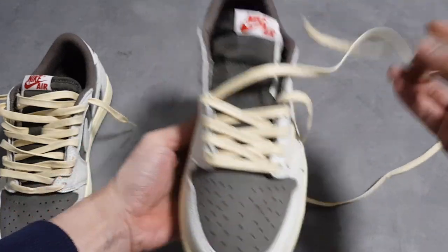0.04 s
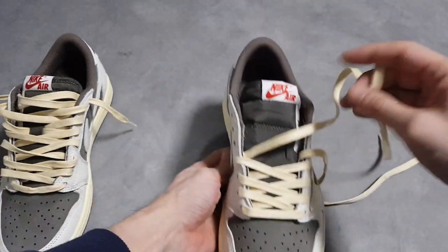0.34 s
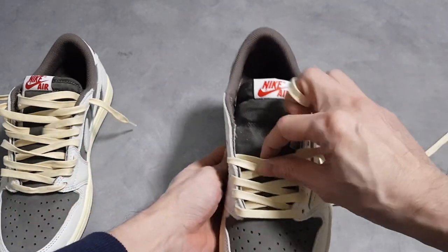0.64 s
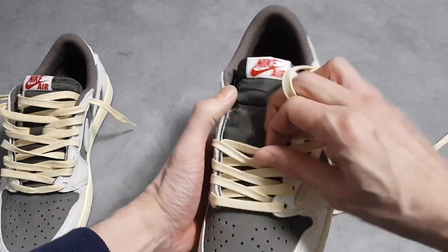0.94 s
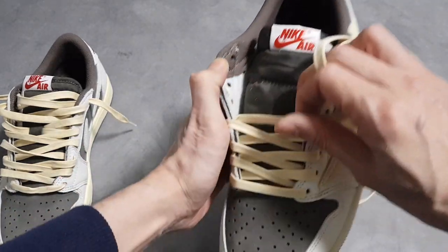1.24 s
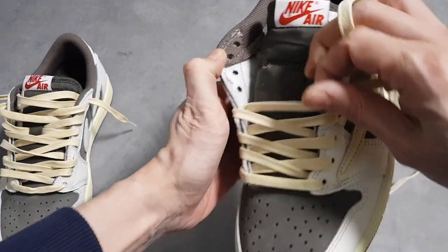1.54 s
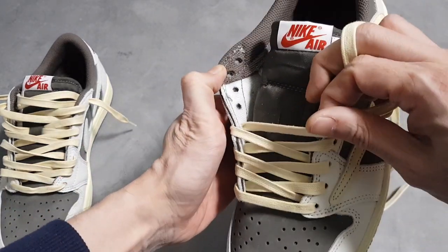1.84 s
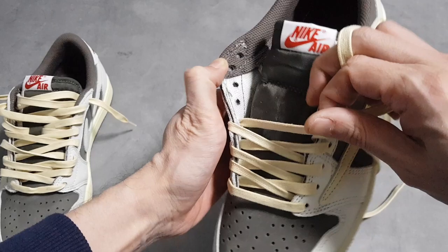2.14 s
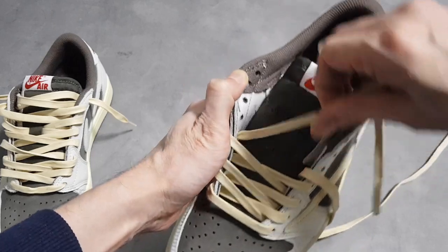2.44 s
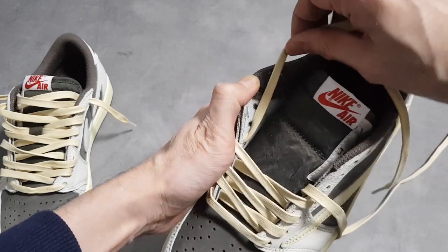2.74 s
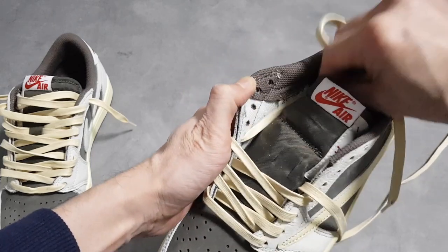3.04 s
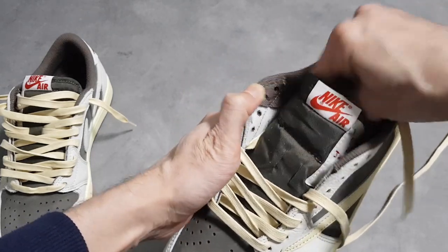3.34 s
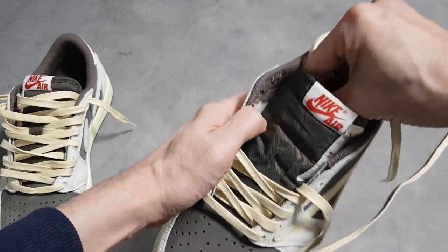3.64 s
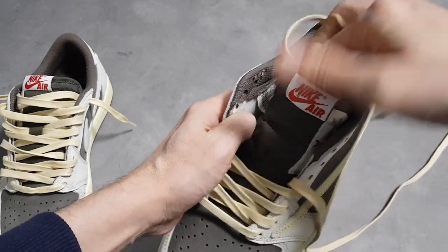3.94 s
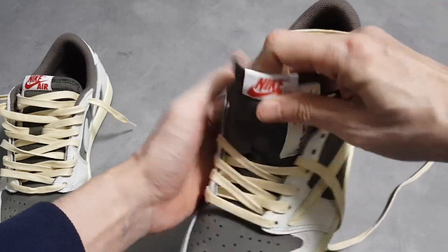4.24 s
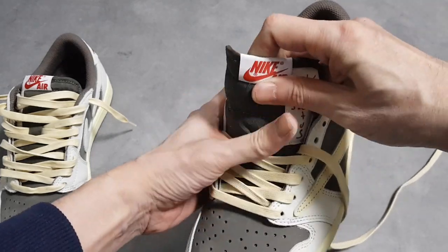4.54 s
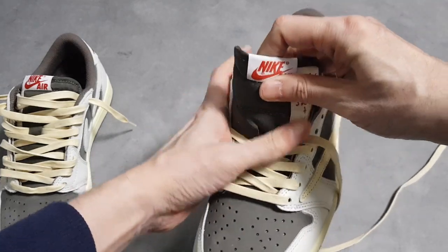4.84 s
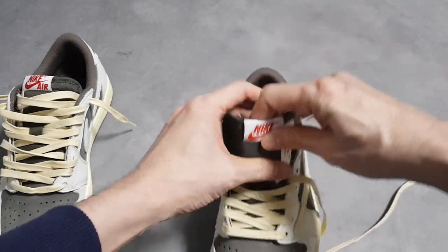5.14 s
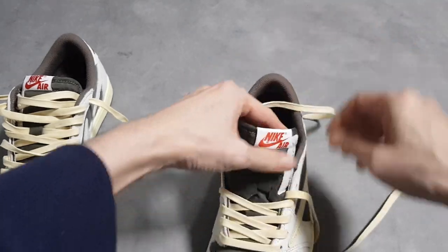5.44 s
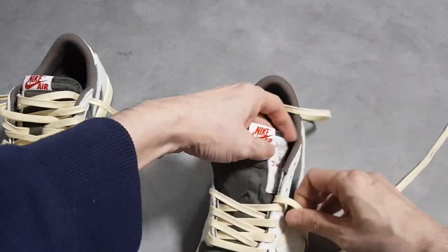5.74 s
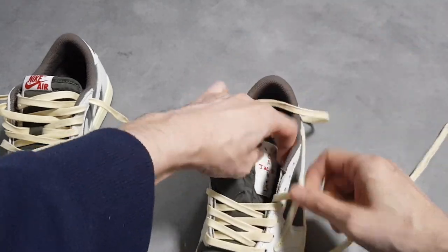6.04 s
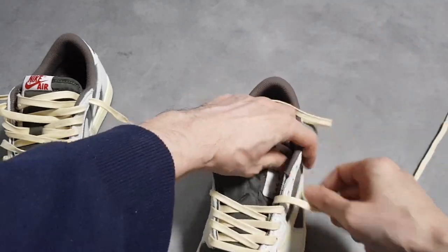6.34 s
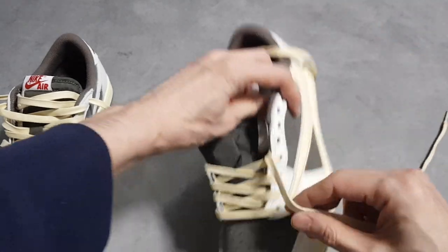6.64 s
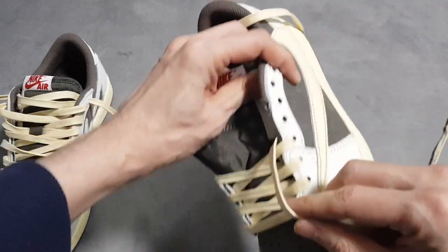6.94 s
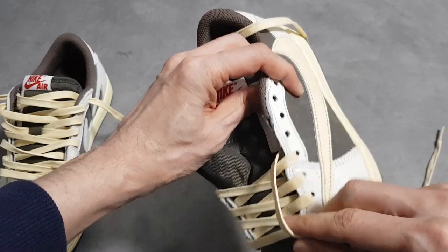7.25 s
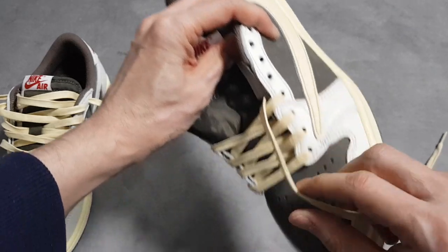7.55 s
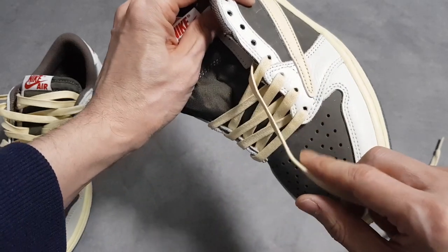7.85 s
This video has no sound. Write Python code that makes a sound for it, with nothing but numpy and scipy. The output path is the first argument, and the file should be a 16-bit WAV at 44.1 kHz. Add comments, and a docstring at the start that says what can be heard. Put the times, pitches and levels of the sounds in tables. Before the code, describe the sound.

In a quiet, small room, close to a stereo microphone, a sneaker is shifted and a hard lace tip clacks on the table and skids. Fingers rustle and scrape at the lace. The leather tongue is dragged out with louder rubbing, small snaps and hollow knocks. The rubber sole thumps down softly and rocks, and the lace slides through an eyelet with a faint zip before the handling dies away.

```python
"""Hands lace a leather sneaker on a table in a quiet, small room, close to a stereo microphone.
The shoe is shifted, and the hard lace tip strikes the table and skids. Fingers loosen the lace, then
drag the tongue out (3 s): stick-slip friction rubs and snaps, and the hollow upper knocks in its modes.
The tongue is tucked back as the rubber sole is set down and rocks (5.2 s). Last, the woven lace is
drawn through an eyelet and sings faintly as its threads pass (6.4 s)."""
import sys
import numpy as np
from scipy import signal
from scipy.fft import rfft, irfft, next_fast_len
from scipy.io import wavfile
from scipy.ndimage import uniform_filter1d

SR = 44100
rng = np.random.default_rng(int(sys.argv[2]) if len(sys.argv) > 2 else 0)


def put_to_file(sound):
    """Save the sound as 16-bit audio at rate SR, in the file named by the first command-line argument."""
    columns = np.atleast_2d(sound).T  # one column per channel
    safe = np.clip(columns, -1, 1)
    whole_steps = np.round(safe * 32767)
    wavfile.write(sys.argv[1], SR, whole_steps.astype(np.int16))


N = 348831
TIME = np.arange(N) / SR


def amplitude(db):
    """The decibel law: 20 dB is a factor of ten in amplitude."""
    return 10 ** (np.asarray(db) / 20)


def unit_rms(x):
    """Normalisation to a mean power of 1."""
    return x / np.sqrt(np.mean(x ** 2) + 1e-20)


def curve_at(points, hz):
    """Interpolation of a table on a logarithmic frequency axis."""
    f, value = np.transpose(points)
    return np.interp(np.log(hz + 1), np.log(f + 1), value)


def add_at(mix, start_s, sound):
    """Superposition: a sound adds to the mix from start_s on."""
    part = mix[..., max(round(start_s * SR), 0):][..., :sound.shape[-1]]
    part += sound[..., :part.shape[-1]]


def filtered(x, spectrum):
    """Zero-phase filtering by a spectrum that falls 12 dB an octave beyond its ends."""
    size = next_fast_len(x.shape[-1] + 2000)
    hz = np.fft.rfftfreq(size, 1 / SR) + 1
    skirts = np.minimum(hz / spectrum[0][0], 1) ** 2 * np.minimum(spectrum[-1][0] / hz, 1) ** 2
    response = amplitude(curve_at(spectrum, hz)) * skirts
    return irfft(rfft(x, size) * response, size)[..., :x.shape[-1]]


def wander(bandwidth_hz):
    """Low-pass Gaussian noise: a smooth random fluctuation of rms 1."""
    size = next_fast_len(N)
    hz = np.fft.rfftfreq(size, 1 / SR)
    low_pass = np.exp(-(hz / bandwidth_hz) ** 2)
    return unit_rms(irfft(rfft(rng.standard_normal(size)) * low_pass, size)[:N])


def swells(movements, drop_db=16, rise_shape=1.31, fall_shape=1.114):
    """Incoherent addition: the powers sum, each drop_db down one rise before and one fall after its peak."""
    t, power = TIME[::32], 0
    for peak_s, rise_s, fall_s, db in movements:
        before = (np.maximum(peak_s - t, 0) / rise_s) ** rise_shape
        after = (np.maximum(t - peak_s, 0) / fall_s) ** fall_shape
        power = power + amplitude(db - drop_db * (before + after)) ** 2
    return np.interp(TIME, t, np.sqrt(power))


def modal_impact(modes, contact_ms, pitch=1, ring=1):
    """Modal superposition: damped sines of alternating sign; a longer contact favours the low modes."""
    t = np.arange(SR // 2) / SR
    contact_s = contact_ms / 1000
    ringing = np.zeros(len(t))
    for k, (hz, db, t60) in enumerate(modes):
        strength = (-1) ** k * amplitude(db) / (1 + (hz * pitch * contact_s) ** 2)
        decay = np.exp(-np.log(1000) * t / (t60 * ring))
        ringing += strength * np.sin(2 * np.pi * hz * pitch * t) * decay
    ringing *= 1 - np.exp(-t / contact_s)
    return ringing / abs(ringing).max()


def click(spectrum, size=2048):
    """Minimum-phase impulse response: the most compact causal pulse with this spectrum, at peak 1."""
    hz = abs(np.fft.fftfreq(size, 1 / SR))
    log_gain = np.log(amplitude(curve_at(spectrum, hz)))
    response = np.exp(np.conj(signal.hilbert(log_gain)))
    pulse = np.fft.ifft(response).real[:size // 2]
    return pulse / abs(pulse).max()


# Likeness of the sound at the two capsules: f/Hz, coherence
CAPSULE_COHERENCE = [(60, 0.66), (300, 0.86), (700, 0.53), (1400, 0.46), (3100, 0.25), (6800, 0),
                     (15000, 0.092)]
def spaced(pair):
    """Spatial coherence: two spaced capsules hear long waves more alike than short ones."""
    size = next_fast_len(pair.shape[-1])
    coherence = np.clip(curve_at(CAPSULE_COHERENCE, np.fft.rfftfreq(size, 1 / SR)), -1, 1)
    mid, side = rfft(pair, size) * np.sqrt([(1 + coherence) / 2, (1 - coherence) / 2])
    return irfft(np.array([mid + side, mid - side]), size)[:, :pair.shape[-1]]


def stereo_noise(samples=N):
    """White noise, partly coherent between the capsules."""
    return spaced(rng.standard_normal((2, samples)))


# Reverberation time of the small room: f/Hz, T60/s
ROOM_DECAY = [(80, 0.5), (300, 0.4), (1000, 0.17), (4000, 0.13), (14000, 0.29)]
def room(x, near_db, tail_db, near_t60=0.046):
    """Convolution: the direct sound is joined by quick scatter from table and hands and by reverberation."""
    t = np.arange(SR // 2) / SR
    hz, frame_s, bands = signal.stft(stereo_noise(len(t)), SR, nperseg=256)
    decay = amplitude(-60 * frame_s / curve_at(ROOM_DECAY, hz)[:, None])
    tail = signal.istft(bands * decay, SR, nperseg=256)[1][:, :len(t)]
    tail *= np.clip((t - .004) / 0.00684, 0, 1)  # builds up after 4 ms
    near = stereo_noise(len(t)) * np.exp(-np.log(1000) * t / near_t60) * (t > .0005)
    echo = amplitude(near_db) * near / np.linalg.norm(near[0])
    echo += amplitude(tail_db) * tail / np.linalg.norm(tail[0])
    reflected = signal.oaconvolve(np.atleast_2d(x), echo, axes=1)[:, :N]
    return (x + reflected) / np.sqrt(1 + np.sum(echo[0] ** 2))


# Spectrum of still air and microphone hiss: f/Hz, level/dB
AIR_SPECTRUM = [(20, -38.5), (55, -8), (85, 1.5), (120, -3), (150, 3), (190, -12), (270, 5), (400, -7),
                (560, -24.5), (1100, -20.5), (1900, -22.5), (4000, -27), (8500, -34.5), (12000, -23),
                (16000, -22)]
def still_air(level_db=-64):
    """Stationary noise: the room and the microphone set a steady floor."""
    return amplitude(level_db) * unit_rms(filtered(stereo_noise(), AIR_SPECTRUM))


# Response of the swaying table: f/Hz, level/dB
TABLE_SPECTRUM = [(20, -38), (38, -8.5), (50, 5), (62, 3.5), (82, 3), (115, -12), (150, -7), (200, -30.5),
                  (320, -30)]
# The hands lean on the table: peak t/s, rise/s, fall/s, level/dB
HAND_LOADS = [(.08, 0.12, 0.18, -47.5), (.4, 0.27, 0.13, -51.5), (5.35, 0.39, 0.62, -53),
              (6.32, 0.043, 0.09, -51), (6.6, .3, .3, -57)]
def table_sway(resting_db=-67.5, coupling_db=-22):
    """Forced vibration: the table rumbles under leaning hands, strokes on the shoe and resting arms."""
    hollow_level = stroke_levels()[0]
    from_shoe = amplitude(coupling_db) * hollow_level
    push = np.sqrt(swells(HAND_LOADS) ** 2 + from_shoe ** 2 + amplitude(resting_db) ** 2)
    return unit_rms(filtered(stereo_noise(), TABLE_SPECTRUM)) * push


# The lace runs through an eyelet, one list a pull: t/s, thread-passing f/Hz, relative level/dB
EYELET_PULLS = [
    [(1.26, 5100, -72), (1.33, 5900, -74), (1.45, 4500, -78), (1.55, 5900, -89)],
    [(6.36, 6150, -68), (6.47, 5850, -66), (6.56, 5550, -65), (6.62, 5700, -74), (6.69, 5350, -71),
     (6.78, 4700, -86)],
]
# Partials of the weave's tone: harmonic number, relative level/dB
WEAVE_HARMONICS = [(1, -5), (2, -5)]
def lace_pulls(gain_db=-4, jitter=.02):
    """Periodic excitation: the pitch is the uneven rate of passing threads and sinks as the hand slows."""
    out = np.zeros(N)
    unevenness = 1 + jitter * wander(400)
    flutter = wander(90)
    for pull in EYELET_PULLS:
        times, thread_hz, db = np.transpose(pull)
        on = (TIME > times[0]) & (TIME < times[-1])
        cycles = np.cumsum(np.interp(TIME[on], times, thread_hz) * unevenness[on]) / SR
        tone = sum(amplitude(level) * np.sin(2 * np.pi * k * cycles) for k, level in WEAVE_HARMONICS)
        envelope = amplitude(np.interp(TIME[on], times, db) + gain_db) * signal.windows.tukey(on.sum(), .2)
        out[on] += unit_rms(tone * flutter[on]) * envelope
    return room(out, near_db=-3, tail_db=-7)


# Modes of the sole on the table: f/Hz, level/dB, T60/s
SOLE_MODES = [(53.5, -20, 0.39), (83.6, -15, 0.14), (156.2, -12, 0.13), (207.7, -6, 0.057),
              (278.3, -1, 0.044), (349.4, -4.5, 0.1), (459.4, -7, 0.053), (609.6, -1, 0.055),
              (937, -13.5, 0.054), (1259, -15.5, 0.025)]
# The sole lands and rocks: t/s, relative level/dB, contact time/ms
SOLE_IMPACTS = [(0.061, -45.5, 30), (0.182, -51, 11), (5.1597, -21, 0.14), (5.164, -19.5, 1.2),
                (5.178, -29, 2), (5.188, -31.5, 7.9), (5.208, -30.5, .7), (5.23, -34, 8.7),
                (5.2637, -34, 0.68), (5.268, -21, 1.2), (5.2762, -35, 4.7), (5.303, -32, 1.9),
                (5.352, -58, 1.7), (5.636, -36, 1.2), (6.336, -41, 4.9)]
def sole_thumps(gain_db=1):
    """Impact excitation: heel and toe meet the table and ring the modes of the rubber sole."""
    out = np.zeros(N)
    for start_s, db, contact_ms in SOLE_IMPACTS:
        add_at(out, start_s, amplitude(db + gain_db) * modal_impact(SOLE_MODES, contact_ms))
    return room(out, near_db=-9, tail_db=-10)


# Modes of the hollow upper, before the grip scales them: f/Hz, level/dB, T60/s
UPPER_MODES = [(289, -13.5, 0.059), (400, 5.5, 0.044), (476.4, 2.5, 0.035), (680, -12, 0.034),
               (850, 4, 0.017), (1090, -7.5, 0.014), (1540, -6.5, 0.019), (2122, -24.5, 0.011)]
# Fingers and lace knock on it: t/s, relative level/dB, contact time/ms, frequency factor, T60 factor
UPPER_IMPACTS = [(0.0483, -29.5, 0.6, 1.16, 1.2), (0.784, -41.5, 0.27, 1.03, 0.9),
                 (0.99, -39.5, 1.6, 1.1, 0.6), (1.131, -40.5, 0.79, 1.14, 1),
                 (1.263, -44, 0.18, 0.97, 0.54), (1.581, -42.5, 0.93, 1.1, 1.3),
                 (2.4215, -40, 1.5, 1.03, 0.68), (2.950, -44.5, 1.1, 0.94, 1.2),
                 (3.05, -30, 0.35, 1.04, 0.54), (3.1329, -33.5, 0.89, 1, 1), (3.173, -38.5, 0.29, 1.07, .8),
                 (3.378, -30.5, 0.71, 1.04, 0.88), (3.402, -25.5, 0.5, 1.16, 0.15),
                 (3.603, -23, 0.13, 1.165, 0.41), (4.000, -30, 0.29, 1.7, 0.14),
                 (4.010, -32.5, 0.66, 1.5, 0.52), (4.404, -38, 0.41, 1.32, 2.3),
                 (4.968, -47, 0.9, 2.43, 1.8), (6.075, -40.5, 2.5, 1.29, 2.2),
                 (6.9015, -44.5, 3.3, 1.07, 3.5), (7.3423, -45.5, 4.3, 1.01, 2.6)]
def upper_knocks(gain_db=2):
    """Damped free vibration: the hollow upper rings after each knock, tuned and damped by the grip."""
    out = np.zeros(N)
    for start_s, db, contact_ms, pitch, ring in UPPER_IMPACTS:
        add_at(out, start_s, amplitude(db + gain_db) * modal_impact(UPPER_MODES, contact_ms, pitch, ring))
    return room(out, near_db=-9, tail_db=-8)


# Threads and leather snap free: t/s, level/dB, decay time/ms
RELEASES = [(.784, -36, 5), (.9393, -54, 3), (1.0805, -50, 3), (1.2634, -46, 3), (3.048, -41, 5),
            (3.1333, -33, 3.5), (3.171, -39, 6), (3.4034, -30, 4), (3.5995, -29, 7), (3.6764, -39, 2),
            (3.854, -34, 3), (4.046, -41, 3), (4.108, -39, 3), (4.138, -39, 3), (4.206, -44, 3),
            (4.217, -42, 2), (4.272, -41, 2.5), (4.6235, -60, 3), (5.043, -40, 5), (5.1595, -37, 5),
            (5.8601, -57, 2)]
# Spectrum of a snap: f/Hz, level/dB
SNAP_SPECTRUM = [(500, -0.5), (1200, -7.5), (2100, -3), (4300, -4), (6500, -5.5), (8500, -12), (15000, -8)]
def snaps():
    """Relaxation: each catch lets go in a noise burst of tiny slips that decays exponentially."""
    t = np.arange(SR // 10) / SR
    envelope = np.zeros(N)
    for start_s, db, decay_ms in RELEASES:
        add_at(envelope, start_s, amplitude(db) * np.exp(-1000 * t / decay_ms))
    bursts = unit_rms(filtered(stereo_noise(), SNAP_SPECTRUM)) * envelope
    return room(bursts, near_db=-14, tail_db=-10, near_t60=.04)


# Skin, lace and rubber drag: start t/s, peak t/s, end t/s, f/Hz, bandwidth of one stage/Hz, level/dB
DRAG_RESONANCES = [(0.575, 0.599, 0.63, 1030, 250, -41), (0.646, 0.722, 0.85, 468, 167, -47),
                   (0.618, 0.672, 0.81, 2320, 910, -44.5), (1.22, 1.32, 1.74, 1900, 200, -72),
                   (3.169, 3.175, 3.185, 950, 298, -38.5), (3.357, 3.375, 3.6, 740, 259, -53),
                   (3.586, 3.604, 3.36, 927, 205, -33), (4.63, 5.014, 5.44, 990, 222, -66.5),
                   (5.186, 5.25, 5.8, 603, 79.5, -55), (5.587, 5.69, 5.82, 570, 130, -55),
                   (5.86, 6.06, 5.7, 530, 110, -54), (6.294, 6.338, 6.365, 1520, 800, -45.5),
                   (6.295, 6.424, 7.03, 1860, 417, -63), (6.363, 6.51, 7.1, 305, 149, -55.5)]
def drags():
    """Resonance: friction noise swells and fades in one narrow band, formed by two filter stages."""
    out, friction = np.zeros((2, N)), stereo_noise()
    for start_s, peak_s, end_s, hz, width_hz, db in DRAG_RESONANCES:
        on = (TIME > start_s) & (TIME < end_s)  # a row that ends before it starts is silent
        b, a = signal.iirpeak(hz, hz / width_hz, SR)
        band = signal.lfilter(b, a, signal.lfilter(b, a, friction[:, on]))
        envelope = np.interp(TIME[on], [start_s, peak_s, end_s], [0, 1, 0])
        out[:, on] += unit_rms(band) * amplitude(db) * envelope
    return out


# The lace tip strikes the table and chatters: t/s, level/dB, left minus right/dB
TIP_IMPACTS = [(.2134, -8, -5), (.2150, -19, 2), (.2156, -18, 4), (.2177, -20, 4), (.2236, -20, 0)]
# Spectra of its strike and of its skid: f/Hz, level/dB
STRIKE_SPECTRUM = [(700, -45), (1300, -30), (2100, -13), (3200, -7), (4400, 0), (5400, 1), (6800, -3),
                   (8600, -17), (12000, -18), (16000, -20)]
SKID_SPECTRUM = [(2500, -24), (3900, -9), (4300, -4.5), (4800, -14), (5700, -10), (6700, -14), (8000, -33)]
# Course of the skid: t/s, level/dB
SKID_ENVELOPE = [(.29, -63), (.36, -57), (.41, -59.5), (.45, -76), (.5, -61.5), (.56, -103.5)]
def lace_tip():
    """Hard impact, then sliding friction: brief contacts give a bright clack, and the tip skids on."""
    strikes = np.zeros((2, N))
    for start_s, db, balance_db in TIP_IMPACTS:
        gains = amplitude([[db + balance_db / 2], [db - balance_db / 2]])
        add_at(strikes, start_s, gains * click(STRIKE_SPECTRUM))
    skid_db = np.interp(TIME, *np.transpose(SKID_ENVELOPE), left=-np.inf, right=-np.inf)
    skid = unit_rms(filtered(stereo_noise(), SKID_SPECTRUM)) * amplitude(skid_db)
    return room(strikes, near_db=2, tail_db=2, near_t60=.06) + skid


def leather_flex(x, depth_db=2.6, hold_s=0.067, size=512):
    """Time-varying filtering: resonances come and go as the leather bends and the grip shifts."""
    hz, frame_s, bands = signal.stft(x, SR, nperseg=size)
    hold_frames = max(round(hold_s / frame_s[1]), 1)
    patches = rng.standard_normal((400, len(frame_s)))
    for _ in range(2):  # smooth over time, then over frequency
        patches = uniform_filter1d(patches, hold_frames, axis=1)
        patches = uniform_filter1d(patches, 3, axis=0)
    row = (40 * np.log1p(hz / 900)).astype(int)  # patches widen towards the treble
    ripple_db = depth_db / (1 + (hz[:, None] / 3500) ** 2) * unit_rms(patches)[row]
    return signal.istft(bands * amplitude(ripple_db), SR, nperseg=size)[1][:, :N]


# Strokes of fingers, tongue and lace: fastest t/s, rise/s, fall/s, cloth level/dB,
# then relative to the cloth: hollow level/dB, leather level/dB, fibre level/dB
HAND_STROKES = [ (.06, 0.13, 0.14, -80, 25, 18, 12.5), (.33, 0.18, 0.16, -69, -1, 0.5, 0),
                (0.588, 0.033, 0.034, -41.5, -4, 0, -2.5), (.645, 0.029, 0.076, -46.5, -15, -3, 4),
                (0.686, 0.068, 0.066, -43.5, -2, 2.5, -10), (.86, 0.6, 0.23, -58.5, -4, -4.5, -2),
                (1.11, 0.21, 0.19, -62.5, 8.5, 3.5, 6.5), (1.262, 0.063, 0.13, -62.5, 12.5, 6, 5.5),
                (1.591, .1, 0.096, -71, 22.5, 10, 8.5), (2.246, 0.067, 0.091, -73.5, 16.5, 2.5, 12),
                (2.41, .13, 0.067, -80.5, 24.5, 6.5, 12), (2.57, 0.13, 0.08, -81.5, 4, -6, 13.5),
                (3.0, 0.16, 0.18, -70.5, 8.5, 8.5, 4.5), (3.045, 0.018, .04, -60, 6, 7, 6),
                (3.111, 0.095, 0.061, -52, 5.5, 5.5, 1), (3.2, 0.084, 0.094, -54, 6, 8, -0.5),
                (3.33, 0.022, 0.043, -55, 8, 1, -1), (3.388, 0.049, 0.054, -44, 0.5, -1.5, 0.5),
                (3.601, 0.023, 0.047, -43, 4, -1, 2.5), (3.655, 0.068, .09, -50, -5, 3, -10),
                (3.77, 0.084, 0.16, -48, 3, 2, -5), (3.88, 0.06, 0.073, -47.5, 5, 1, -2.5),
                (3.999, 0.12, 0.17, -52, 9, 8.5, -5), (4.122, 0.09, 0.12, -48.5, 6.5, 1.5, 2.5),
                (4.281, .045, 0.053, -52.5, 7, 4.5, 5.5), (4.375, 0.021, 0.076, -62.5, 10, 10.5, 14.5),
                (4.66, 0.055, 0.17, -73, 11, 8.5, 2), (4.921, .13, 0.15, -60.5, -2.5, -7, 0.5),
                (5.06, 0.042, .06, -56, 0.5, -0.5, -11), (5.135, 0.098, 0.16, -50, 0.5, -1.5, -1.5),
                (5.258, 0.056, .045, -44, 7, -5, -2), (5.34, 0.088, 0.23, -53, -1.5, -13, -11),
                (5.47, 0.042, 0.074, -59.5, 5, -3.5, 8.5), (5.56, 0.024, 0.032, -57.5, 4.5, -11, 3),
                (5.692, 0.087, 0.086, -52, 8, -1.5, 0.5), (5.938, 0.11, 0.1, -62.5, 13, 5, 10),
                (6.071, 0.062, 0.087, -58.5, 5.5, 1, 6.5), (6.17, .07, 0.14, -68.5, -6, -6, 7.5),
                (6.34, 0.055, 0.083, -55, 14.5, 0.5, 4), (6.521, 0.17, 0.2, -65, 4, -4.5, 6.5),
                (7.39, .03, 0.036, -77, 15.5, 3.5, 5.5), (7.56, 0.14, 0.29, -85.5, 10, 4.5, 8.5)]
def stroke_levels():
    """Coupling: the place of contact sets how hard a stroke drives hollow, leather, cloth and fibres."""
    peak_s, rise_s, fall_s, cloth_db, hollow_db, leather_db, fibre_db = np.transpose(HAND_STROKES)
    return [swells(zip(peak_s, rise_s, fall_s, cloth_db + above_db))
            for above_db in (hollow_db, leather_db, 0, fibre_db)]


# Spectra of the shoe's hollow, leather scrape, cloth swish and fibre fizz: f/Hz, level/dB
HOLLOW_SPECTRUM = [(110, -13.5), (220, -12), (320, -9), (410, 4), (520, -1.5), (600, -7.5), (720, -8),
                   (850, -34.5), (1200, -81)]
LEATHER_SPECTRUM = [(550, -43), (780, 0.5), (980, 7), (1280, -2), (1600, 1.5), (1950, 1.5), (2400, -8),
                    (2800, -25.5), (3800, -49.5)]
CLOTH_SPECTRUM = [(1900, -21), (2800, 0), (3500, -0.5), (4300, 0.5), (5500, -0.5), (7000, -1.5),
                  (8200, -10), (10500, -23.5)]
FIBRE_SPECTRUM = [(6500, -11), (8300, -9.5), (10000, 0), (12000, 1.5), (15500, -1.5), (17000, -14.5)]
# The holding hand never rests: level/dB in each of these four layers
GRIP_LEVELS = (-75.5, -79.5, -91.5, -91)
def rubbing(slips_per_s=5000, slip_spread_db=2.0, smooth_share=0.56, clump_db=1.77, clump_hz=130,
            fidget_db=5.5, fidget_hz=6.4):
    """Stick-slip friction: fibres slip in clumps, and each slip sounds in all four layers at once."""
    slip_sizes = amplitude(slip_spread_db * np.minimum(rng.exponential(1, N), 5))
    slipping = rng.random(N) < slips_per_s / SR
    slips = unit_rms(spaced(slip_sizes * slipping * rng.standard_normal((2, N))))
    friction = np.sqrt(smooth_share) * stereo_noise() + np.sqrt(1 - smooth_share) * slips
    clumps = amplitude(clump_db * wander(clump_hz))
    drive = leather_flex(friction * clumps)
    grip_drift_db = fidget_db * wander(fidget_hz)
    spectra = (HOLLOW_SPECTRUM, LEATHER_SPECTRUM, CLOTH_SPECTRUM, FIBRE_SPECTRUM)
    out = np.zeros((2, N))
    for spectrum, stroke, grip_db in zip(spectra, stroke_levels(), GRIP_LEVELS):
        envelope = np.hypot(stroke, amplitude(grip_db + grip_drift_db))
        out += unit_rms(filtered(drive, spectrum)) * envelope
    return room(out, near_db=-8, tail_db=-11)


def scene():
    """Linear superposition: the pressures of all sources add over the still air of the room."""
    return (still_air() + rubbing() + drags() + snaps() + lace_tip() + lace_pulls()
            + upper_knocks() + table_sway() + sole_thumps())


# Level difference between the capsules: f/Hz, left minus right/dB
CAPSULE_BALANCE = [(50, 0.5), (150, 2.5), (280, -2), (550, 5), (1100, 0), (3000, 1), (9000, 0.1),
                   (15000, 2.2)]
def record(dry, cutoff_hz=15850):
    """Interchannel level difference, then a band limit: the left capsule is a little louder in most bands."""
    heard = []
    for channel, sign in zip(dry, (1, -1)):
        response = [(hz, sign * db / 2) for hz, db in CAPSULE_BALANCE]
        heard.append(filtered(channel, [(0.9, 0)] + response + [(SR, 0)]))
    low_pass = signal.firwin(611, cutoff_hz, window=("kaiser", 8), fs=SR)
    return signal.oaconvolve(np.array(heard), low_pass[None], "same")


dry = scene()
out = record(dry)
put_to_file(out)
```